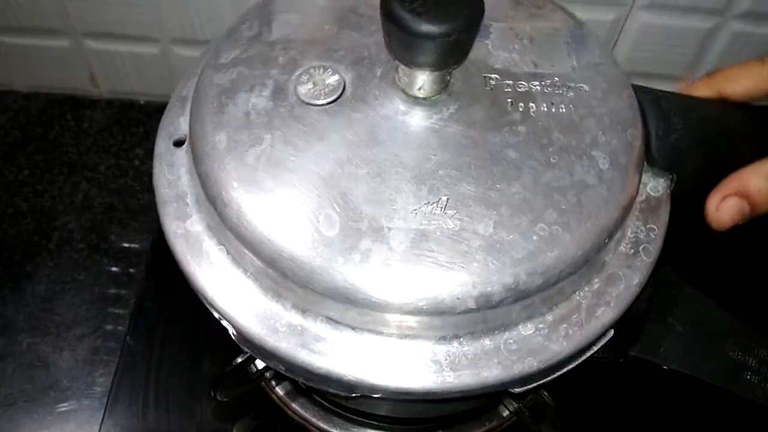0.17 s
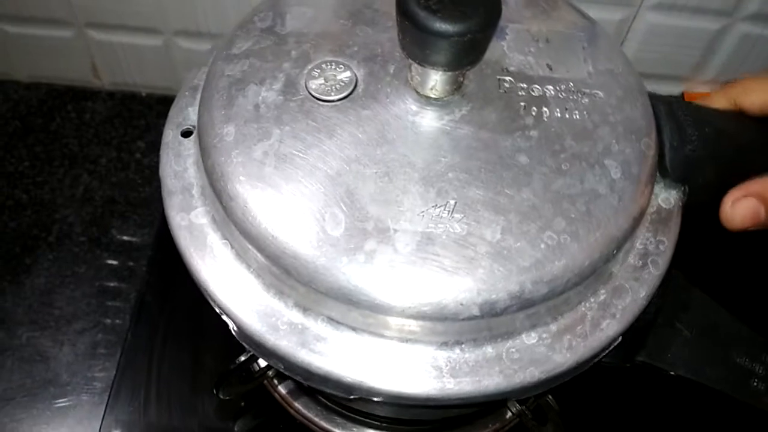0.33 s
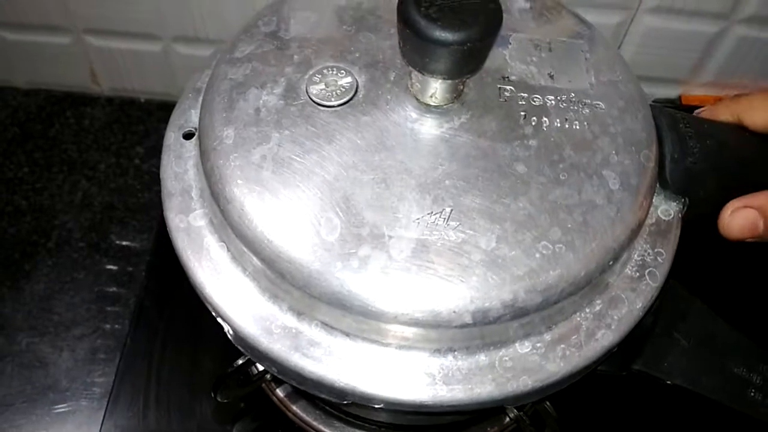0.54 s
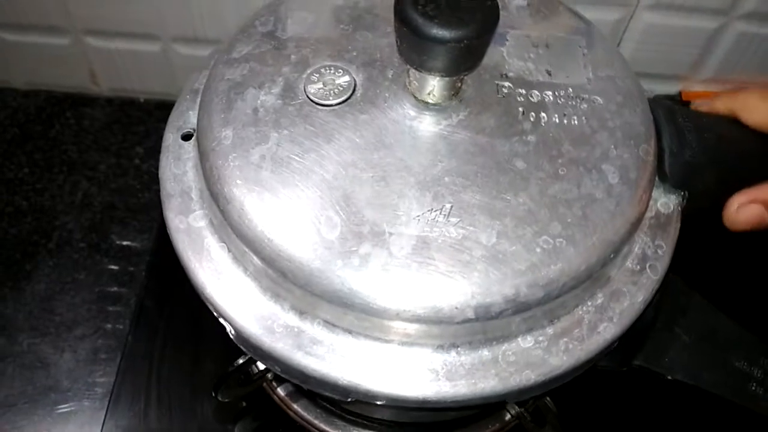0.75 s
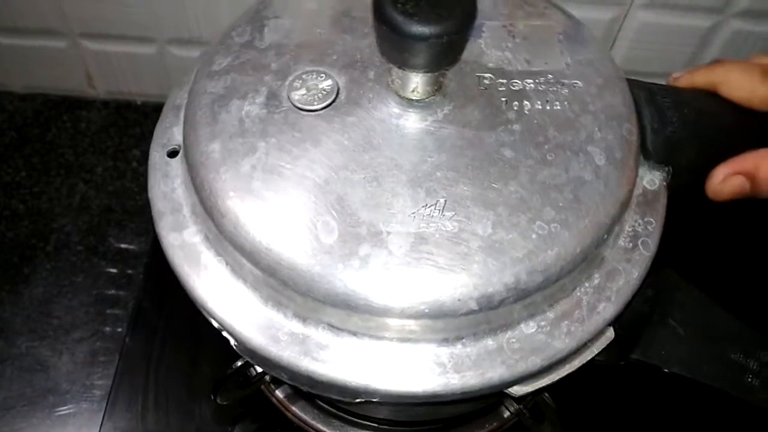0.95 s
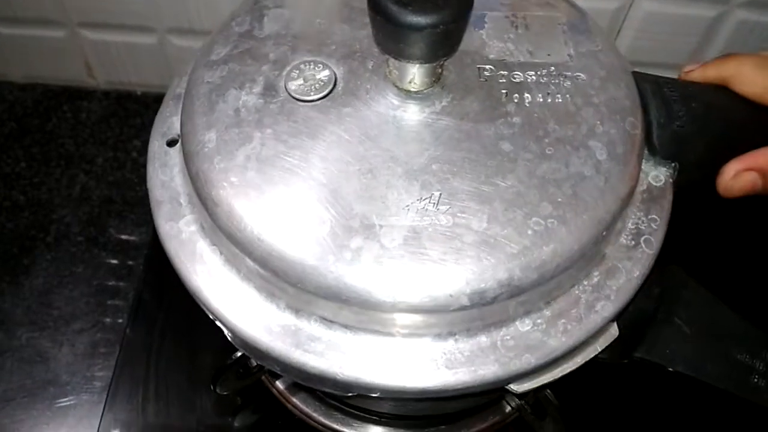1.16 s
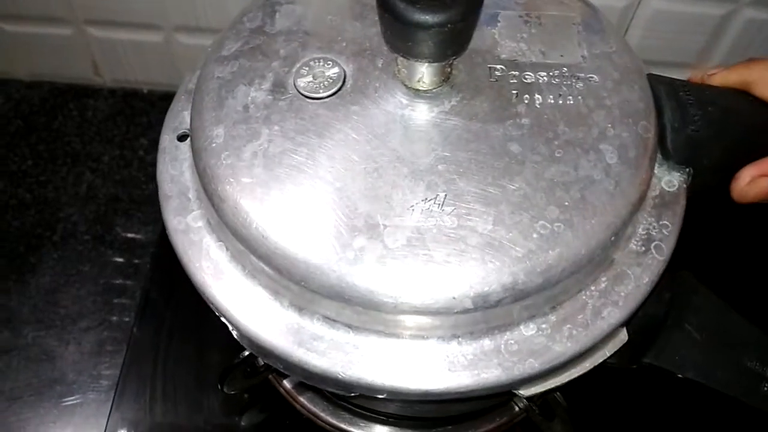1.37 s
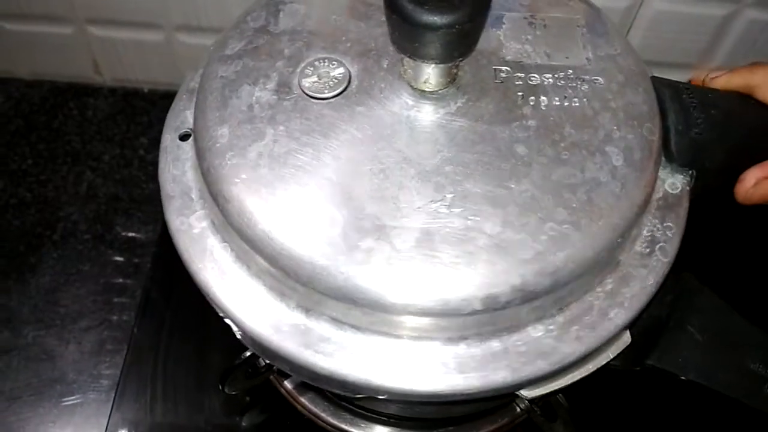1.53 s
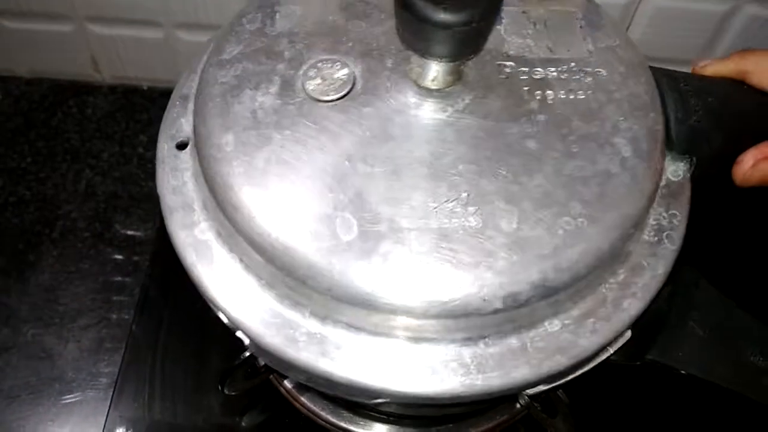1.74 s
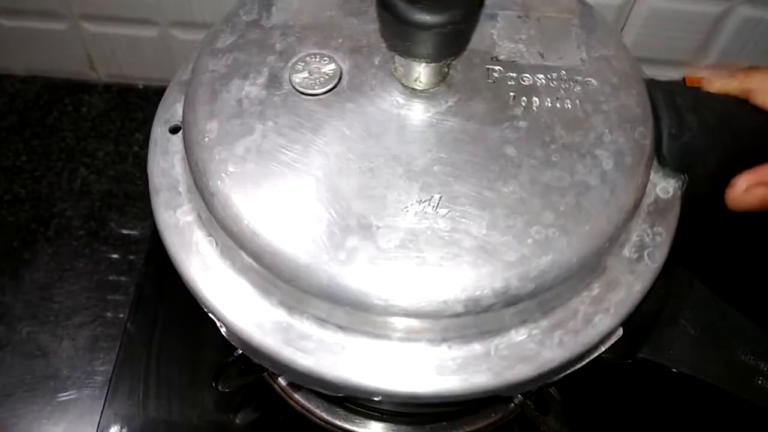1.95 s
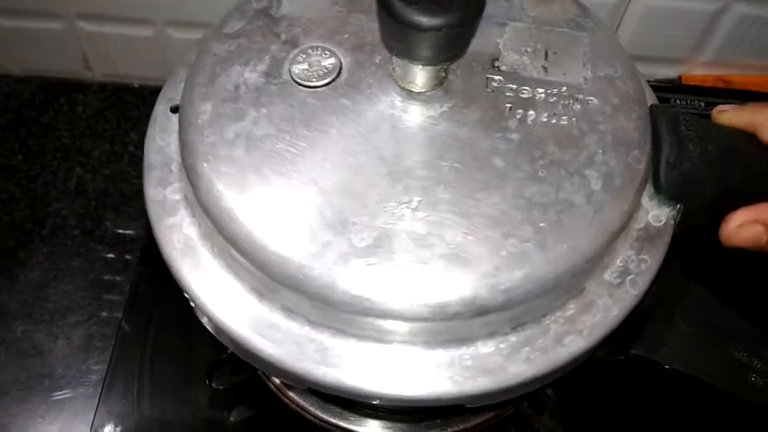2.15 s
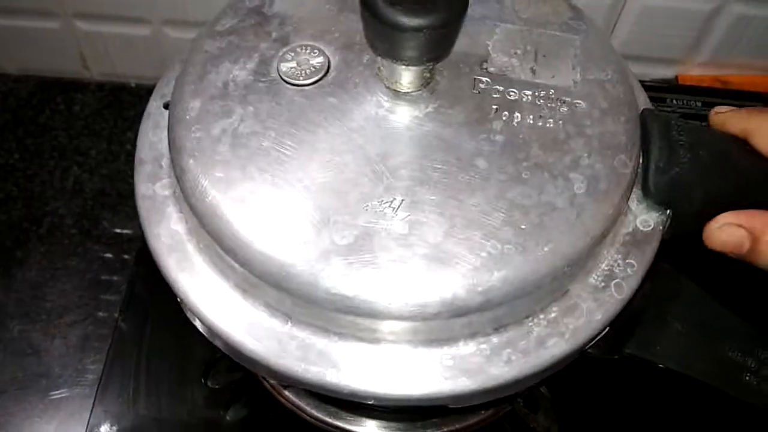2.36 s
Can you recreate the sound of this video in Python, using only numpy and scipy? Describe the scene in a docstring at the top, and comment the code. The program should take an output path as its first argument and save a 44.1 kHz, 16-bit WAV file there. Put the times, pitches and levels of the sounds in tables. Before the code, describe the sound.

A metal pressure cooker lid clatters onto its pot, close by in a small kitchen, with a loud ringing clank near 0.3 seconds. Rim scrapes and lighter hollow knocks follow, with another clank around 1 second. The rubber seal gives one short squeak near 1.5 seconds. After more scraping, a run of hard clanks shuts the lid from 2 to 2.3 seconds, and a soft thump follows near 2.5.

```python
"""An aluminium pressure cooker lid is seated on its pot and twisted shut, close by, in a small kitchen.
The lid clatters on, loudest near 0.27 s: each rim contact thumps the air in the pot, knocks the pot on
its stand and sets the metal ringing. Between contacts the rims scrape. Near 1.5 s the rubber gasket
gives one short squeak, and from 2.0 to 2.3 s the lid shuts with a run of hard contacts."""
import sys
import numpy as np
from scipy import signal
from scipy.fft import rfft, irfft
from scipy.io import wavfile
from scipy.ndimage import uniform_filter1d

SR = 44100
rng = np.random.default_rng(int(sys.argv[2]) if len(sys.argv) > 2 else 0)


def master_out(mix):
    """Clip the mix to full scale and print it as 16-bit PCM to the path in sys.argv[1]."""
    frames = np.transpose(np.atleast_2d(mix))
    ceiling = np.clip(frames, -1, 1)
    pcm = np.round(ceiling * 32767).astype(np.int16)
    wavfile.write(sys.argv[1], SR, pcm)


N = 110250
T = np.arange(N) / SR
RING_T = T[:int(.35 * SR)]
BIN_HZ = np.fft.rfftfreq(N, 1 / SR)
LN_1000 = np.log(1000)   # time constants per t60


def from_db(db):
    """Decibels to gain."""
    return 10 ** (np.asarray(db) / 20)


def unit_rms(x):
    """Scale to unit rms."""
    return x / np.sqrt(np.mean(x ** 2) + 1e-20)


def at_hz(table, hz, column=1):
    """Interpolate a table column over log frequency."""
    table = np.array(table)
    return np.interp(np.log(hz), np.log(table[:, 0]), table[:, column])


def add(out, time_s, sound):
    """Mix a sound in at time_s."""
    start = max(int(time_s * SR), 0)
    out[..., start:start + sound.shape[-1]] += sound[..., :N - start]


def stereo(mid, side, correlation):
    """Two independent noises to a correlated left/right pair."""
    return (np.sqrt(1 + correlation) * mid + np.sqrt(1 - correlation) * side * [[1], [-1]]) / np.sqrt(2)


def white_noise(correlation, size=N):
    """Stereo white noise."""
    return stereo(*rng.standard_normal((2, size)), correlation)


def shaped_noise(gain, correlation):
    """Unit-rms stereo noise; gain and correlation per FFT bin."""
    mid, side = rfft(rng.standard_normal((2, N)))
    return unit_rms(irfft(gain * stereo(mid, side, correlation), N))


def swell(start_s, length_s):
    """Rise and fall of one scrape."""
    progress = np.clip((T - start_s) / length_s, 0, 1)
    return np.sqrt(np.maximum(np.sin(np.pi * progress), 0))


def bloom(t, rise_s):
    """Envelope that peaks at 1 at rise_s, then decays."""
    u = np.maximum(t, 0) / rise_s
    return u * np.exp(1 - u)


def room(x, decay_s):
    """Diffuse stereo kitchen reverb, unit gain."""
    tail = white_noise(0.22, len(RING_T)) * np.exp(-RING_T / decay_s)
    response = unit_rms(tail) / np.sqrt(len(RING_T))
    return signal.fftconvolve(x[None], response, axes=1)[:, :N]


# room noise spectrum: (frequency [Hz], relative density [dB])
FLOOR_SPECTRUM = [(25, 4.5), (55, 1), (110, -0.5), (200, -12), (380, -2.5), (600, -16), (1200, -21),
                  (3000, -23), (6000, -29), (12000, -17), (16000, -28.5)]


def kitchen_floor(level_db=-65.5):
    """Faint steady room noise, alike at both ears in the bass."""
    hz = np.maximum(BIN_HZ, 1)
    gain = from_db(at_hz(FLOOR_SPECTRUM, hz))
    return from_db(level_db) * shaped_noise(gain, correlation=0.8 / (1 + (hz / 900) ** 2))


# squeak contour: (time [s], pitch [Hz], level [dB])
SQUEAK_CONTOUR = [(1.426, 451.4, -80), (1.438, 471, -56.5), (1.462, 439.5, -59), (1.478, 465.7, -36),
                  (1.49, 486, -67), (1.505, 533, -44.5), (1.52, 482, -50), (1.548, 482, -80)]
# squeak harmonics 1-5: (relative level [dB])
SQUEAK_HARMONICS_DB = [-3.5, -2.5, -22, -28.5, -24]


def gasket_squeak(pitch_jitter=.045):
    """The rubber seal sticks and slips at an unsteady pitch as the lid turns."""
    time_s, hz, db = np.transpose(SQUEAK_CONTOUR)
    wobble = unit_rms(uniform_filter1d(rng.standard_normal(N), size=150))
    pitch_hz = np.interp(T, time_s, hz) * (1 + pitch_jitter * wobble)
    phase = 2 * np.pi * np.cumsum(pitch_hz) / SR
    tone = sum(from_db(level) * np.sin(k * phase) for k, level in enumerate(SQUEAK_HARMONICS_DB, 1))
    squeak = tone * np.interp(T, time_s, from_db(db), left=0, right=0)
    return squeak + from_db(-3) * room(squeak, decay_s=0.036)


# rim contacts, also driving air and metal: (time [s], thump level [dB], thump pitch [Hz],
# knock level [dB], metal level [dB], metal tilt [dB/octave], metal accent [Hz])
RIM_CONTACTS = [(.001, -39, 365.6, -59, -58, -1.5, 2700), (.058, -36, 391.7, -53, -52.5, -7.5, 4640),
                (.116, -44, 440, -68, -63, -10, 2300), (.169, -37.5, 377.7, -48, -59, -4, 2670),
                (0.207, -37, 403, -44.5, -39.5, 0.5, 2450), (0.231, -34, 407, -53, -60.5, -6, 2500),
                (.259, -24, 386.7, -42, -34.5, -1, 2564), (0.2728, -29.5, 401.3, -36, -28, 0.75, 11380),
                (.436, -46.5, 410.4, -49, -69.5, 8.5, 10700), (.460, -45, 414, -56, -65.5, 2, 11400),
                (0.512, -81, 366, -67, -61, 3, 1900), (0.5991, -46, 527, -70, -40.5, -2, 1750),
                (0.746, -44.5, 290, -55.5, -77, -10, 900), (.824, -36.5, 384.6, -74.5, -71.5, -8.5, 1390),
                (0.925, -69.5, 394, -75, -50.5, -1, 3560), (.964, -33.5, 379.6, -34.5, -36, -3, 5000),
                (1.115, -30, 373.3, -66.5, -54, -2, 1310), (1.288, -49, 699, -75.5, -57.5, -7, 2130),
                (1.59, -34.5, 381.5, -56, -50, -4.5, 4300), (1.697, -36, 409, -45, -41.5, 1, 2630),
                (1.777, -66, 360, -54, -65.5, 7, 15100), (1.896, -43.5, 368, -54.5, -72, -5, 950),
                (1.912, -48, 384, -54.5, -55, -4.5, 5350), (1.979, -32.5, 392, -42.5, -44.5, -2, 2500),
                (2.017, -21, 386, -39.5, -35.5, -2, 5000), (2.086, -54, 392, -41.5, -47.5, -1, 3870),
                (2.133, -45, 400, -36.5, -50.5, -3.5, 912), (2.1512, -29.5, 385, -33, -26.5, 0, 5240),
                (2.216, -31, 375, -43.5, -40.5, -2.5, 1090), (2.261, -34, 371.3, -50, -56, 2, 1090),
                (2.308, -46.5, 381, -54.5, -68, 4.5, 12420), (2.473, -39, 367.6, -71, -68.5, -7.5, 1310)]
# pot on its stand: (frequency [Hz], relative level [dB], t60 [s])
STAND_MODES = [(122.5, -9.5, 0.25), (180.5, -7.5, 0.28), (224.4, -1, 0.26), (279.8, 7, 0.097)]


def pot_knocks(rise_s=0.001, spread_db=2):
    """Contacts rock the pot on its stand."""
    out, t = np.zeros(N), RING_T
    for hz, mode_db, t60_s in STAND_MODES:
        envelope = np.exp(-LN_1000 * t / t60_s) * (1 - np.exp(-t / rise_s))
        for time_s, _, _, knock_db, *_ in RIM_CONTACTS:
            gain = from_db(knock_db + mode_db + rng.normal(0, spread_db))
            add(out, time_s, gain * envelope * np.sin(2 * np.pi * (hz * t + rng.random())))
    return out


# higher air modes in the pot: (ratio to thump pitch, relative level [dB], t60 [s])
AIR_MODES = [(2.86, -24.5, .09), (3.58, -14.5, 0.069), (4.1, -26, 0.095)]


def air_thumps(echo_delay_s=.036, echo_db=-13.5, room_db=-12.5):
    """The enclosed air thumps hollowly at each contact; the room returns it."""
    out, t = np.zeros(N), RING_T
    echo = from_db(echo_db) * bloom(t - echo_delay_s, rise_s=.011)
    envelope = from_db(4.5) * (bloom(t, rise_s=0.0064) - echo)
    for time_s, thump_db, hz, *_ in RIM_CONTACTS:
        phase = 2 * np.pi * hz * t
        overtones = sum(from_db(db) * np.exp(-LN_1000 * t / t60_s) * np.sin(ratio * phase)
                        for ratio, db, t60_s in AIR_MODES)
        add(out, time_s, from_db(thump_db) * (envelope * np.sin(phase) + overtones))
    return out + from_db(room_db) * room(out, decay_s=0.049)


# sliding rims: (start [s], length [s], air level [dB], metal level [dB], metal tilt [dB/octave])
RIM_SCRAPES = [(.0, 0.048, -41.5, -78, -6), (0.164, 0.17, -40, -53.5, -2), (0.317, 0.19, -51, -70.5, 6),
               (.912, .025, -65, -62.5, 3), (0.934, 0.045, -43, -49, -1.5), (0.972, 0.066, -41, -55.5, 0.5),
               (1.281, 0.056, -54.5, -62.5, -7), (1.477, 0.022, -69, -50, 2.5),
               (1.644, 0.084, -53.5, -61.5, -4.5), (1.69, 0.016, -40.5, -36.5, 1),
               (1.705, 0.063, -41.5, -58, -10.5), (1.774, 0.48, -55.5, -74, -4.5),
               (1.963, 0.05, -39.5, -48, -2.5), (2.035, .11, -48.5, -53.5, 0.5),
               (2.484, 0.033, -46.5, -59.5, 2)]


def air_murmur(resonance_hz=377.5, stage_width_hz=138):
    """Scrapes keep the air in the pot murmuring at its resonance."""
    b, a = signal.iirpeak(resonance_hz, resonance_hz / stage_width_hz, fs=SR)
    murmur = unit_rms(signal.lfilter(b, a, signal.lfilter(b, a, white_noise(0.7))))
    envelope = sum(from_db(db + 1) * swell(start_s, length_s) for start_s, length_s, db, *_ in RIM_SCRAPES)
    return murmur * envelope


def scrape_slips(slips_per_s=900, spread_db=3.5):
    """Tiny uneven stick-slip clicks of the rims, one row per scrape."""
    clicks = (rng.random(N) < slips_per_s / SR) * rng.choice([-1, 1], N)
    sizes = from_db(spread_db * np.clip(rng.standard_normal(N), -2, 2))
    slips = unit_rms(clicks * sizes) / np.sqrt(0.014 * SR)   # unit energy per 14 ms
    return np.array([slips * swell(start_s, length_s) for start_s, length_s, *_ in RIM_SCRAPES])


def rim_force(hz, slips, spread_db, expansion=0, knee_hz=1240):
    """Drive of contacts and scrapes on the metal near hz; expansion makes soft blows ring less."""
    octaves = np.log2(max(hz, knee_hz) / 3000)   # tilt is flat below the knee
    time_s, _, _, _, hit_db, hit_tilt, accent_hz = np.transpose(RIM_CONTACTS)
    *_, scrape_db, scrape_tilt = np.transpose(RIM_SCRAPES)
    top_db = hit_db.max()
    force = from_db(scrape_db + expansion * (scrape_db - top_db) + scrape_tilt * octaves) @ slips
    # the point of contact favours one group of modes
    accent_db = 5 * np.exp(-.5 * (np.log2(hz / accent_hz) / 0.12) ** 2)
    chance_db = spread_db * np.clip(rng.standard_normal(len(time_s)), -1, 1)
    impulse_db = hit_db + expansion * (hit_db - top_db) + hit_tilt * octaves + accent_db + chance_db
    force[(time_s * SR).astype(int)] += from_db(impulse_db)
    return force


def ring_power(force, decay_s):
    """Power of a decaying ring fed by every click of the force."""
    return signal.lfilter([1], [1, -np.exp(-2 / (decay_s * SR))], force ** 2 + 1e-18)


def crowded_modes(spacing_hz=85, ragged_db=7.5):
    """Noise with a ragged spectrum, as of hundreds of overlapping modes, partly different at each ear."""
    grid_hz = np.arange(2000) * spacing_hz
    shared, left, right = rng.standard_normal((3, len(grid_hz)))
    strengths = [np.clip((shared + ear) / np.sqrt(2), -2, 2) for ear in (left, right)]
    gain = from_db([ragged_db * np.interp(BIN_HZ, grid_hz, strength) for strength in strengths])
    return shaped_noise(gain, correlation=1 / (1 + (BIN_HZ / 650) ** 2))


# stereo balance of the metal: (frequency [Hz], left minus right [dB])
METAL_BALANCE = [(500, -1.5), (1200, -2), (2500, -0.5), (5300, -1), (9000, 0), (14000, 2.5)]


def metal_pan(hz):
    """Left and right gains of the metal at hz."""
    return from_db(at_hz(METAL_BALANCE, hz) * np.array([[.5], [-.5]]))


# crowded modes of lid and pot: (frequency [Hz], band gain [dB], t60 [s])
SHELL_BANDS = [(302.4, 12, 0.51), (605, 13, 0.39), (918, 24.5, 0.16), (1220, 13.5, 0.31),
               (1700, 13.5, 0.25), (2460, 19, 0.23), (3380, 10, .27), (4490, 11.5, 0.24), (5430, 15.5, 0.3),
               (5950, 9, 0.38), (6740, 10.5, 0.39), (7850, 8, 0.27), (10370, 9.5, 0.35),
               (11080, 15.5, 0.35), (14000, 7, 0.12), (15150, -1.5, 0.36)]


def shell_wash(slips, build_s=0.0018):
    """Lid and pot ring band by band: direct snap, early clatter, long tail in the room."""
    out = np.zeros((2, N))
    build_pole = np.exp(-1 / (build_s * SR))
    crowds = [crowded_modes(), crowded_modes()]   # adjacent bands use independent noise
    cracks = [white_noise(0.24), white_noise(0.24)]
    edges_hz = np.concatenate([np.geomspace(250, 2000, 8)[:-1], np.geomspace(2000, 16500, 17)])
    for k, (low_hz, high_hz) in enumerate(zip(edges_hz, edges_hz[1:])):
        hz = np.sqrt(low_hz * high_hz)
        force = rim_force(hz, slips, spread_db=3.0)
        snap = from_db(-0.5) * np.sqrt(ring_power(force, decay_s=0.0031)) * cracks[k % 2]
        clatter_power = from_db(-2.5) ** 2 * ring_power(force, decay_s=0.0074)
        tail_power = from_db(-9.5) ** 2 * ring_power(force, at_hz(SHELL_BANDS, hz, column=2) / LN_1000)
        wash_power = signal.lfilter([1 - build_pole], [1, -build_pole], clatter_power + tail_power)
        wash = np.sqrt(wash_power) * crowds[k % 2]
        bandpass = signal.butter(2, [low_hz, high_hz], "band", fs=SR, output="sos")
        out += from_db(at_hz(SHELL_BANDS, hz)) * metal_pan(hz) * signal.sosfilt(bandpass, snap + wash)
    return out


# prominent lid modes: (frequency [Hz], relative level [dB], t60 [s])
CLEAR_MODES = [(778, -11.5, 0.29), (897, -14, .25), (1056, -30.5, 0.29), (2840, -8.5, 0.2),
               (5320, -2.5, 0.18), (5270, 1, 0.14), (5740, -12.5, 0.11), (5870, -15, 0.24),
               (7160, -11, 0.2), (8600, -8.5, 0.27), (10760, -0.5, 0.2), (11700, -9, 0.22),
               (12100, -1, 0.24)]


def lid_ring(slips):
    """Clear modes of the lid, each four close partials that beat."""
    out = np.zeros((2, N))
    for hz, db, t60_s in CLEAR_MODES:
        force = rim_force(hz, slips, spread_db=1.5, expansion=0.22) + 1e-18
        for max_detune_hz in (-70, -42, 35, 70):
            partial_hz = hz + max_detune_hz * rng.random()
            pole = np.exp((2j * np.pi * partial_hz - LN_1000 / t60_s) / SR)
            ear_gains = from_db(db - 10) * metal_pan(hz) * np.exp(2j * np.pi * rng.random((2, 1)))
            out += (ear_gains * signal.lfilter([1], [1, -pole], force)).real
    return out


def scene():
    """Metal, pot air, stand, gasket and room noise, in stereo."""
    slips = scrape_slips()
    metal = shell_wash(slips) + lid_ring(slips)
    return metal + air_thumps() + air_murmur() + pot_knocks() + gasket_squeak() + kitchen_floor()


def record(dry, stopband_hz=16400):
    """Steep low-pass."""
    return signal.sosfilt(signal.cheby2(16, 70, stopband_hz, fs=SR, output="sos"), dry)


dry = scene()
out = record(dry)
master_out(out)
```